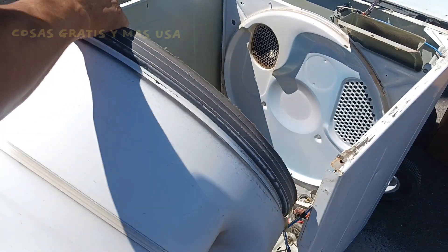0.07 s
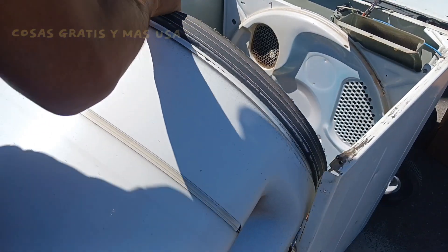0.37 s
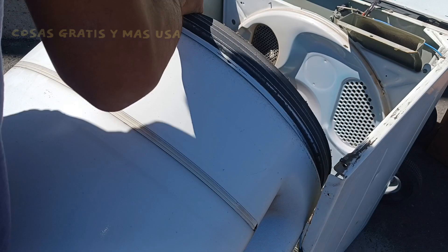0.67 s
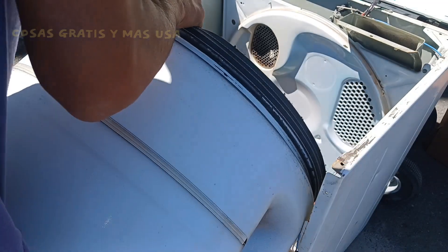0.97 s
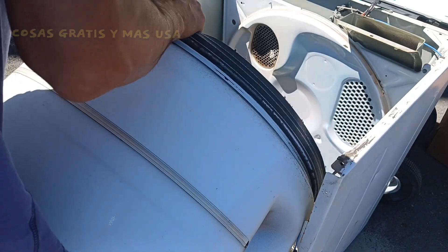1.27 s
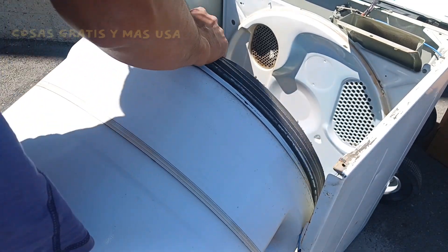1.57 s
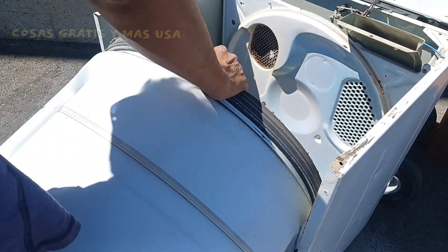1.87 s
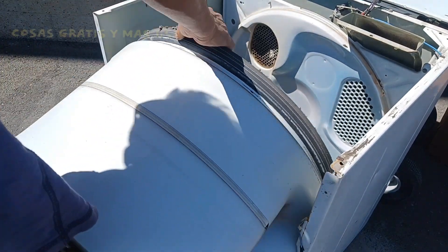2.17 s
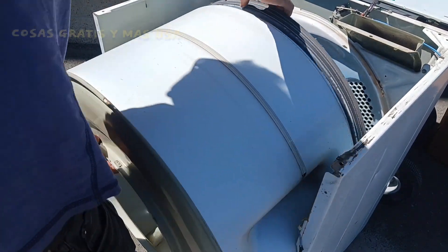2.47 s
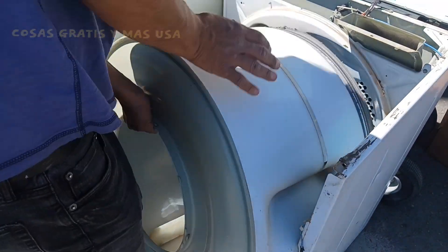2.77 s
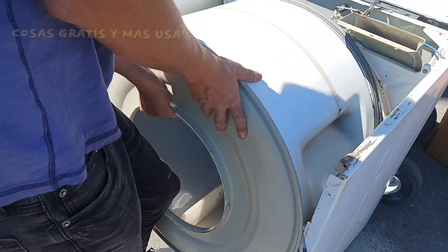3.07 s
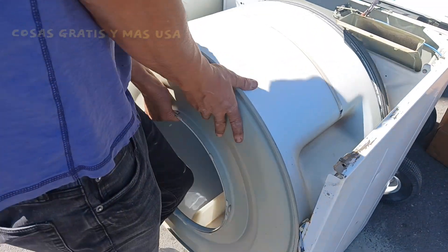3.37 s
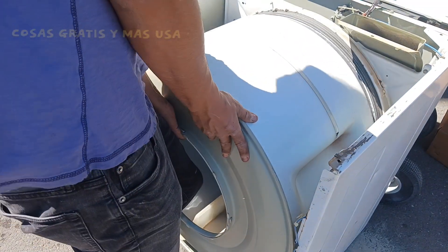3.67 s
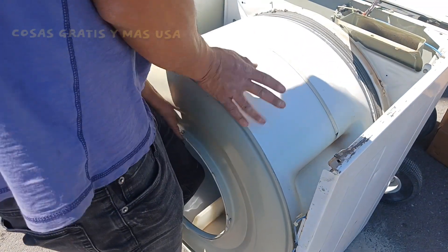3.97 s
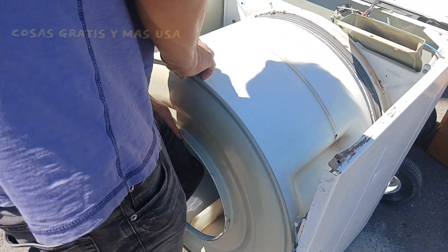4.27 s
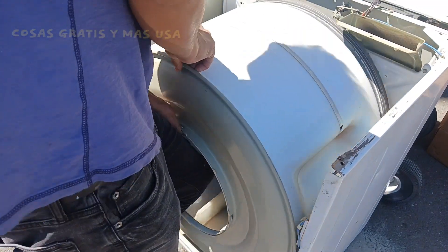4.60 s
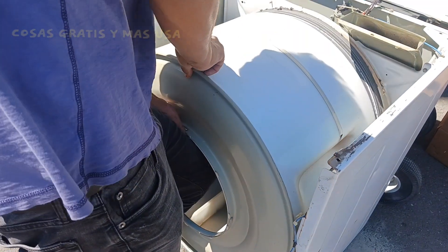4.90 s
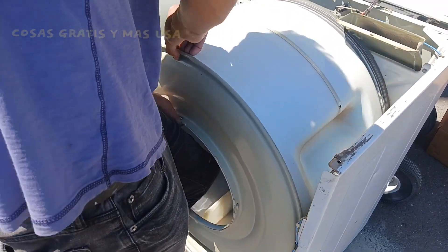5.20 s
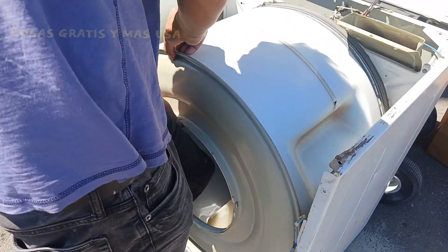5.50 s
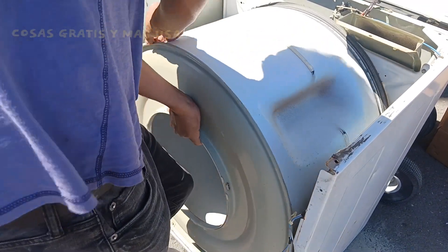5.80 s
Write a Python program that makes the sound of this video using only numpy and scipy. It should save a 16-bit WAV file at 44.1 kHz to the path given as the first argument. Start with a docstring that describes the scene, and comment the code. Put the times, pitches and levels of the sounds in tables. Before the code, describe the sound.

A large sheet-metal drum scrapes, knocks and squeaks against steel edges, groaning loudly once, while a breeze buffets the microphone outdoors.

```python
"""A large sheet-metal dryer drum is dragged and lowered into its cabinet, outdoors and close by.
Its rim sticks and slips over the steel edges, knocks against them, squeaks and once locks into a loud
groan. The jolts make the thin shell ring at its own natural tones, called modes. Light ticks, dull
bumps and a soft rustle come with the handling. A breeze buffets the two microphone openings,
and a quiet yard lies behind it all."""
import sys
import numpy as np
from scipy import signal
from scipy.fft import rfft, irfft, next_fast_len
from scipy.io import wavfile
from scipy.ndimage import uniform_filter1d, map_coordinates

SR = 44100
rng = np.random.default_rng(int(sys.argv[2]) if len(sys.argv) > 2 else 0)


def transcribe(u):
    """Save the signal u as a 16-bit wav file named by the first command-line argument.

    u: samples, shape (n,) or (channels, n), limited to [-1, 1]; the rate is SR.
    q: integer samples, one column per channel.
    """
    v = np.clip(np.atleast_2d(u).T, -1, 1)
    q = np.round(v * 32767).astype(np.int16)
    wavfile.write(sys.argv[1], SR, q)


N = 266540

# The drum speaks in four bands, low to high: boom, clang, rasp, sizzle. Table levels are relative.
BAND_EDGES_HZ = [150, 800, 2800, 7500, 17000]
OPPOSITE = np.array([[1], [-1]])  # plus on the left, minus on the right

# shoves that slide the rim: t/s, length/s, boom level/dB, bite (clang over boom)/dB, resonance f/Hz
SHOVES = [(0, 0.089, -51, 0, 480), (0.17, 0.04, -43.5, 5, 520), (0.355, 0.12, -22, -4, 540),
          (0.492, .29, -28.5, -10.5, 402), (0.91, 0.35, -40.5, -5, 370), (1.384, 0.087, -32, -0.5, 565),
          (1.626, 0.018, -29, -1.5, 486), (1.963, .06, -30.5, 0.5, 544), (2.065, 0.19, -25, -3, 536),
          (2.204, 0.26, -18, -2.5, 664), (2.48, 0.094, -17, -10.5, 605), (2.643, 0.097, -18.5, -2.5, 690),
          (2.75, 0.095, -16.5, -10.5, 555), (2.921, 0.15, -16.5, -6, 580), (3.025, 0.059, -12.5, -.5, 650),
          (3.108, 0.13, -21.5, -11.5, 580), (3.465, 0.24, -38.5, -3, 430), (3.705, 0.096, -38.5, -13, 380),
          (4.063, 0.0091, -39.5, -13, 386), (4.2, 0.37, -45.5, -12, 395), (4.469, 0.068, -32.5, -2, 436),
          (4.613, 0.065, -21, -1.5, 467), (4.755, 0.08, -22.5, -4.5, 417), (4.918, 0.048, -30, -7.5, 430),
          (5.187, 0.017, -20, -2.5, 610), (5.296, 0.076, -22.5, -7, 440), (5.423, 0.27, -31.5, -4.5, 400),
          (5.58, 0.094, -26, -2, 497), (5.728, 0.04, -27.5, -6.5, 460), (5.927, 0.059, -28, -6, 483)]
# how a shove feeds each of the four bands: offset/dB, share of the bite
SHOVE_BANDS = [(0.08, 0), (-2, 0.97), (-12, 1.39), (-17, 1.37)]
# metal hitting metal: t/s, clang level/dB, weight (extra boom)/dB, hardness (extra treble)/dB,
# f/Hz that the struck spot favours
KNOCKS = [(.042, -55.5, 3, 1.5, 6600), (.117, -54.5, 1, 10.5, 12350), (.297, -40, -9, -8, 540),
          (.357, -38.5, 8, 0, 507), (.392, -23.5, -6, -2, 3390), (.483, -51, 23, 5, 6350),
          (.685, -40, -12, -1, 540), (.951, -56, 2, 3.5, 3770), (.975, -40, -24, -4, 3800),
          (1.06, -45.5, -20, -0.5, 2200), (1.116, -43, -5, -0.5, 1800), (1.214, -47.5, -3, 8.5, 574),
          (1.231, -32.5, -9, -4, 2130), (1.298, -32.5, -22, -6.5, 543), (1.325, -17.5, -4.5, -8.5, 562),
          (1.402, -37.5, -19, -1, 5800), (1.487, -36.5, 6.5, -8, 656), (1.757, -57, -6, 2.5, 4140),
          (1.931, -34, -1, -15, 1150), (2.047, -28, 2, -12.5, 660), (2.19, -39, 5, -3, 490),
          (2.312, -26.5, -11, -11.5, 555), (3.229, -36.5, 5, -33, 480), (3.463, -45.5, 3, -5.5, 2850),
          (3.566, -38, 1.5, -24, 1235), (3.606, -43, 4, -12, 1690), (4.06, -47.5, 0, -33, 395),
          (4.438, -33.5, -6, -10, 470), (4.538, -42.5, 15, -3.5, 566), (4.616, -36.5, 13, 5.5, 1110),
          (4.642, -19, -1.5, -6.5, 1530), (4.724, -31.5, 5, -5.5, 483), (5.139, -24, -8, -19.5, 818),
          (5.156, -24.5, -1.5, -10.5, 860), (5.285, -25, 0.5, -7.5, 3550), (5.445, -55.5, 20, 4.5, 520),
          (5.579, -36.5, 8, 1, 533), (5.622, -29.5, 3.5, -10, 820), (5.907, -30, -9, -11.5, 1850)]
# the tones that make up the groan: multiple of its pitch, level/dB
GROAN_HARMONICS = [(1, -3.5), (2, -16.5), (3, -25), (4, -24), (5, -34), (6, -30)]
# brief squeaks of the rim: middle t/s, length/s, f/Hz, level/dB
SQUEAKS = [(.4, 0.017, 5400, -32), (0.398, .03, 5720, -39), (0.502, 0.12, 498, -34),
           (.788, 0.2, 484.6, -38.5), (0.876, .18, 200, -40), (2.194, 0.021, 484, -24.5),
           (2.346, 0.14, 560.8, -23.5), (2.492, 0.037, 774, -26), (2.682, .03, 640, -24),
           (2.706, 0.051, 1944, -30), (2.803, 0.048, 420, -28.5), (2.905, 0.098, 227, -34),
           (2.988, 0.089, 545.5, -24), (3.06, 0.19, 787, -28.5), (3.09, 0.11, 686, -25.5),
           (3.11, 0.22, 1115, -44), (5.164, 0.037, 1550, -29), (5.3, .036, 3490, -48),
           (5.911, .03, 4856, -44.5)]
# hands and knee bumping the shell: t/s, level/dB
BUMPS = [(.228, -33), (1.49, -31), (1.631, -29.5), (2.059, -24), (2.164, -24), (2.315, -18.5), (3.25, -39),
         (3.594, -29.5), (3.792, -38), (4.859, -27.5), (4.915, -26), (5.646, -27.5)]
# the shell's strongest modes: f/Hz, level/dB
STRONG_MODES = [(221, -4.5), (275, -9), (331, -9), (404, -13), (476, -13), (552, -2), (589, 1), (649, -26),
                (700, -0.5), (732, 4), (802, 2), (888, 3), (1114, -5), (1139, -9), (1192, -27), (1542, -16),
                (1733, -28), (1962, -11), (2401, -8), (2441, -1), (2637, -3), (3461, -15), (3779, -27),
                (3992, -13), (5316, -30)]
# the shell's crowd of weaker modes: f/Hz, level/dB
WEAK_MODE_SPECTRUM = [(120, -13.5), (210, -3), (320, -3), (480, -2), (660, -7), (880, -5.5), (1250, -5),
                      (1900, -7.5), (2600, -17), (3400, -20.5), (4600, -22), (8000, -34), (12500, -30.5),
                      (16000, -30)]
# how long the free shell takes to fade by 60 dB: f/Hz, ring time/s
RING_TIMES = [(200, 0.69), (500, 0.62), (1400, 0.34), (3700, 0.23), (9000, 0.23), (16000, 0.082)]
# how wide the shell sounds: f/Hz, level of the sides over the middle/dB
STEREO_WIDTH = [(120, -33), (380, -11.5), (700, -8), (1300, -5.5), (2400, -4), (4400, 0), (8000, 4),
                (15000, -1)]
# hands and clothes brushing the paint: t/s, length/s, level/dB
BRUSHES = [(0, .1, -62), (0.107, 0.31, -53.5), (0.546, 0.39, -54.5), (1.571, 0.13, -51), (1.869, 0.07, -49),
           (2.064, 0.02, -36.5), (2.36, 0.046, -33.5), (2.627, 0.032, -43.5), (2.89, 0.03, -34),
           (3.45, 0.23, -52), (3.8, 0.023, -56), (3.91, 0.12, -64.5), (4.16, 0.064, -59),
           (4.39, 0.046, -54), (4.544, 0.14, -39), (4.79, 0.044, -51), (5.044, 0.066, -56),
           (5.16, 0.025, -36.5), (5.724, 0.3, -46.5), (5.99, 0.091, -47.5)]
# strength of the breeze: t/s, level/dB
BREEZE = [(0, -41), (.19, -49), (.37, -31), (.77, -41.5), (1.28, -47.5), (1.62, -29.5), (1.78, -43.5),
          (2.2, -32.5), (2.7, -41.5), (3.15, -35), (3.8, -35.5), (3.92, -42), (4.22, -48), (4.5, -32),
          (5.05, -35), (5.6, -30.5), (6.04, -36)]
# strong swirls of air hitting the microphone: t/s, level/dB, f/Hz
EDDIES = [(1.499, -21, 100), (1.565, -22, 85), (2.2, -18, 90), (2.328, -11.5, 115), (2.462, -17, 80),
          (3.027, -16.5, 90), (3.115, -23, 100), (3.162, -15, 120), (3.26, -18, 100), (3.379, -16.5, 125),
          (4.09, -23, 75), (4.634, -20, 100), (4.771, -21, 90), (4.835, -16.5, 85), (4.928, -18, 90),
          (5.158, -16, 85), (5.652, -14, 115), (5.771, -23, 90), (6.002, -17, 90)]
# the low rumble of the wind: f/Hz, level/dB
WIND_SPECTRUM = [(20, -10), (40, -1), (62, 6.5), (95, 4.5), (130, 4), (180, -3.5), (300, -6.5), (600, -54)]
# the outdoor background: f/Hz, level/dB
YARD_SPECTRUM = [(30, 16), (150, -28), (500, -3), (1500, 21), (4000, -36), (8000, -35), (16000, -39)]


def scrape(force, levels, resonance_hz, judder_db=0.88):
    """The rim judders along the cabinet; as the contact moves, two spots of the shell fade in and out."""
    spots = [damped(shell_tap(modes_db=-12.5, crack_db=-29, crack_s=0.005), 0.14) for _ in range(2)]
    shell = bend(sum(excite(force * from_db(4.2 * drift(8)), spot) for spot in spots))
    boom = resonate(shell, resonance_hz, lift_db=12.5, width_octaves=1)
    _, clang, rasp, _ = split_bands(shell)
    sound = sum(level * steady(part, seconds=0.039) for level, part in zip(levels, [boom, clang, rasp]))
    return from_db(judder_db * drift(30)) * sound


def slips(per_s, spread_db):
    """The rim sticks and lets go: tiny jolts of uneven size that come in clumps."""
    happens = rng.random(N) < per_s * from_db(4 * drift(40)) / SR
    sizes = from_db(spread_db * np.minimum(rng.exponential(1, N), 4))
    return happens * sizes * rng.choice([-1, 1], N) + 0.013 * rng.standard_normal(N)


def shoves(rounding_s=0.0063):
    """Each shove swells and fades; the strongest one at any moment sets each band's level."""
    rises_s, falls_s = [0.37, 0.21, 0.21, 0.37], [0.66, 0.49, 0.25, 0.18]  # per 60 dB, for each band
    resting_db = [-72, -85, -71.5, -65]  # the rim never quite stops rubbing
    start_s, length_s, boom_db, bite_db, hz = np.transpose(SHOVES)[:, :, None]
    t = np.arange(0, N, 64) / SR
    outside_s = np.maximum([start_s - t, t - start_s - length_s], 0)
    early, late = np.hypot(outside_s, rounding_s) - rounding_s  # the drum's weight softens both ends
    bands = [from_db(boom_db + db + share * bite_db - 60 * (early / rise_s + late / fall_s))
             for (db, share), rise_s, fall_s in zip(SHOVE_BANDS, rises_s, falls_s)]
    levels = [np.hypot(pushes.max(axis=0), from_db(db)) for pushes, db in zip(bands, resting_db)]
    # each shove has its own hollow pitch, and the loudest shoves dominate the blend
    boom_power = bands[0] ** 2
    resonance_hz = np.sum(hz * boom_power, axis=0) / np.sum(boom_power, axis=0)
    return over_time(np.transpose([t, *levels, resonance_hz]))


def snags(levels, per_s=70, level_db=-15.5):
    """The sliding rim catches on rough bits of steel, each giving a small, dry crack."""
    crack = damped(shell_tap(modes_db=-11, crack_db=7, crack_s=0.0026), 0.018)
    happens = rng.random(N) < per_s / SR
    force = happens * from_db(level_db - np.clip(rng.standard_normal(N), -2, 2))
    return sum(excite(force * level, part / np.std(part[:, :SR // 100]))
               for level, part in zip(levels, split_bands(crack)[1:]))


def knocks(spot_lift_db=5, steel_rasp_db=5, snap_db=-7.5, snap_s=0.0067):
    """A blow is a sharp click plus the ring of one spot; weight and hardness balance its bands."""
    spots = [damped(shell_tap(modes_db=-8.5, crack_db=-19.5, crack_s=0.045), 0.45) for _ in range(3)]
    length, attack = spots[0].shape[1], int(0.018 * SR)
    clicks, click_gains = split_bands(signal.unit_impulse(length)), from_db([-5.5, -12, -21, -12])
    snap = 1 + from_db(snap_db) * np.exp(-np.arange(length) / SR / snap_s)  # a louder first instant
    out = np.zeros((2, N))
    for k, (s, clang_db, weight_db, hardness_db, hz) in enumerate(KNOCKS):
        start, spot = int(s * SR), snap * spots[k % len(spots)]
        favoured = signal.lfilter(*signal.iirpeak(hz, Q=11.7, fs=SR), spot)
        rings = split_bands(spot + from_db(spot_lift_db) * favoured)
        levels_db = clang_db + np.array([weight_db, 0, hardness_db + steel_rasp_db, 2 * hardness_db])
        for db, ring, click, gain in zip(levels_db, rings, clicks, click_gains):
            blow = ring / np.std(ring[:, :attack]) + gain * click / np.std(click[:attack])
            out[:, start:start + length] += from_db(db) * blow[:, :N - start]
    return from_db([[0.8], [-0.2]]) * out


def groan(level, pitch_hz=479.5, waver=0.0042):
    """The slips fall in step with one mode of the shell and make a nearly pure tone."""
    phase = 2 * np.pi * np.cumsum(pitch_hz * (1 + waver * drift(40))) / SR + 0.085 * OPPOSITE
    tone = sum(from_db(db + 0.76 * drift(90)) * np.sin(multiple * phase)
               for multiple, db in GROAN_HARMONICS)
    return level * unit_power(tone) * from_db([[-0.5], [0.5]])


def squeaks(waver=0.011, flutter_db=4):
    """The slips briefly lock to a mode: short, rough tones swell out of the scrape and sink back."""
    wobbly_time = np.cumsum(1 + waver * drift(160)) / SR
    flutter = from_db(flutter_db * drift(150))
    out = np.zeros((2, N))
    for (s, length_s, hz, db), side in zip(SQUEAKS, rng.choice([-1, 1], len(SQUEAKS))):
        near, bell = swell(s, length_s / 2)
        tone = np.sqrt(2) * np.sin(2 * np.pi * hz * wobbly_time[near] + side * stereo_phase(hz))
        out[:, near] += from_db(db) * bell * flutter[near] * tone
    return from_db(4.1) * out


def bumps():
    """A soft hand or knee wakes only the low modes and hushes them at once."""
    thud = damped(band(shell_tap(modes_db=5, crack_db=3, crack_s=0.0049), 110, 520), 0.057)
    force = np.zeros(N)
    for s, db in BUMPS:
        force[int(s * SR)] = from_db(db)
    return excite(force, thud / np.std(thud[:, :SR // 50]))


def shell_tap(modes_db, crack_db, crack_s):
    """The shell's answer to one tap: a first crack, a crowd of fading modes and a few strong ones."""
    t = np.arange(int(0.5 * SR)) / SR
    edges = np.geomspace(110, 17500, 23)
    noise = rng.standard_normal((2, 2, len(t)))
    crowd, strong = 0, 0
    for k, (low, high) in enumerate(zip(edges, edges[1:])):
        hz = np.sqrt(low * high)
        middle, sides = band(noise[k % 2], low, high)  # many close modes sound like noise
        width = from_db(at_hz(STEREO_WIDTH, hz))
        stereo = (middle + width * sides * OPPOSITE) / np.hypot(1, width)
        crowd += stereo * from_db(at_hz(WEAK_MODE_SPECTRUM, hz) - 60 * t / at_hz(RING_TIMES, hz))
    crowd *= 1 + from_db(crack_db) * np.exp(-t / crack_s)
    for (hz, db), (phase, side) in zip(STRONG_MODES, rng.uniform(-np.pi, np.pi, (len(STRONG_MODES), 2))):
        tone = np.sin(2 * np.pi * hz * t + phase + np.sign(side) * stereo_phase(hz))
        strong += tone * from_db(db - 60 * t / at_hz(RING_TIMES, hz))
    return unit_power(crowd) + from_db(modes_db) * unit_power(strong)


def bend(shell, depth=0.01411, per_s=9):
    """The thin wall bends under the load, so all its modes slide a little in pitch."""
    shift = depth * SR / per_s * uniform_filter1d(drift(per_s), SR // 30)
    return np.array([map_coordinates(side, [np.arange(N) + shift], order=3, mode="nearest")
                     for side in shell])


def resonate(shell, resonance_hz, lift_db, width_octaves):
    """Keep the shell's low range and boost the part near its moving resonance."""
    edges, size = np.geomspace(130, 1050, 10), next_fast_len(N)
    spectrum, hz = rfft(shell, size), np.arange(size // 2 + 1) * SR / size
    out = 0
    for low, high in zip(edges, edges[1:]):
        distance = np.log2(np.sqrt(low * high) / resonance_hz) / width_octaves
        part = irfft(spectrum * ((hz >= low) & (hz < high)), size)[:, :N]
        out += part * from_db(lift_db * np.exp(-distance ** 2))
    return out


def damped(ring, decay_s):
    """Something pressed on the shell shortens its ring."""
    return ring * np.exp(-np.arange(ring.shape[1]) / SR / decay_s)


def excite(force, ring):
    """Every jolt in the force starts its own copy of the ring."""
    return signal.fftconvolve(force[None], ring, axes=1)[:, :N]


def rustle(force, sizzle, grit=0.25, flare_s=0.0016):
    """Rim, hands and clothes rub dryly: a bright hiss that flares with every slip."""
    hiss = shaped_noise((2, N), [(2000, 6.5), (5000, -0.5), (8000, -5), (12500, -2), (16000, -5)])
    slip_power = signal.lfilter([1], [1, -np.exp(-1 / (flare_s * SR))], force ** 2)
    flare = steady(np.sqrt(slip_power), seconds=0.26)
    grainy_hiss = hiss * np.sqrt(1 - grit + grit * flare ** 2)
    brushing = sum(from_db(db) * envelope(s, length_s, rise_s=0.12, fall_s=0.26)
                   for s, length_s, db in BRUSHES)
    return np.hypot(sizzle, brushing) * from_db([[4.0], [1.8]]) * grainy_hiss


def wind(lump_db=9, eddy_s=0.0035, right_over_left_db=4.5):
    """Churning air rumbles at each microphone opening; one swirl gives a swing or two of pressure."""
    breeze_db, = over_time(BREEZE)
    air = np.zeros((2, N))
    for side in range(2):
        rumble = steady(shaped_noise(N, WIND_SPECTRUM), seconds=0.0444)
        air[side] = rumble * from_db(breeze_db + 2.5 + lump_db * np.tanh(drift(45)))
    for (s, db, hz), (offset, skew) in zip(EDDIES, rng.uniform(-0.34, 0.44, (len(EDDIES), 2))):
        near, bell = swell(s, eddy_s)
        cycles = hz * near / SR + offset + 0.35 * skew * OPPOSITE
        air[:, near] += from_db(db) * np.sqrt(2) * bell * np.sin(2 * np.pi * cycles)
    return air * from_db(-OPPOSITE * right_over_left_db / 2)  # the right opening faces the breeze


def yard(level_db=-61):
    """The faint, even hush of the outdoors."""
    return from_db(level_db) * shaped_noise((2, N), YARD_SPECTRUM)


def from_db(db):
    """Turn decibels into a number to multiply by."""
    return 10 ** (np.asarray(db) / 20)


def unit_power(x):
    """Scale a sound so its average power is 1."""
    return x / np.sqrt(np.mean(x ** 2) + 1e-20)


def steady(x, seconds):
    """Even out a sound so its power stays near 1 all along."""
    power = uniform_filter1d(np.mean(np.atleast_2d(x) ** 2, axis=0), int(seconds * SR))
    return x / np.sqrt(np.abs(power) + 1e-18)


def over_time(rows):
    """Join a table's timed points with lines, giving a value at every sample."""
    times, *columns = np.transpose(rows)
    return np.array([np.interp(np.arange(N) / SR, times, column) for column in columns])


def at_hz(table, hz):
    """Look up a frequency in a table, with octaves evenly spaced."""
    known_hz, values = np.transpose(table)
    return np.interp(np.log(np.maximum(hz, 1)), np.log(known_hz), values)


def stereo_phase(hz):
    """Put left and right out of step so a tone sounds as wide as the shell."""
    return np.arctan(from_db(at_hz(STEREO_WIDTH, hz))) * OPPOSITE


def band(x, low_hz, high_hz):
    """Keep what lies between two frequencies."""
    return signal.sosfilt(signal.butter(4, [low_hz, high_hz], "band", fs=SR, output="sos"), x)


def split_bands(x):
    """Split a sound into boom, clang, rasp and sizzle."""
    return [band(x, low, high) for low, high in zip(BAND_EDGES_HZ, BAND_EDGES_HZ[1:])]


def shaped_noise(shape, spectrum):
    """Noise of power 1, coloured by a list of (f/Hz, level/dB) points."""
    gains = from_db(at_hz(spectrum, np.arange(N // 2 + 1) * SR / N))
    return unit_power(irfft(rfft(rng.standard_normal(shape)) * gains, N))


def drift(per_s):
    """A random wander of typical size 1 that turns per_s times a second."""
    points = rng.standard_normal(N // 40)
    return np.interp(np.arange(N) * per_s / SR, np.arange(len(points)), points) * np.sqrt(1.5)


def swell(s, width_s):
    """A bell-shaped swell around a moment: its sample numbers and its heights."""
    near = np.arange(max(int((s - 4 * width_s) * SR), 0), min(int((s + 4 * width_s) * SR), N))
    return near, np.exp(-0.5 * ((near / SR - s) / width_s) ** 2)


def envelope(start_s, hold_s, rise_s, fall_s):
    """Rise to 1, hold and die away; rise_s and fall_s each cover 60 dB."""
    t = np.arange(N) / SR - start_s
    fade = np.maximum(-t, 0) / rise_s + np.maximum(t - hold_s, 0) / fall_s
    return from_db(-60 * np.minimum(fade, 2))


def scene():
    """Add up the drum, the handling, the wind and the quiet yard."""
    force = slips(per_s=260, spread_db=4.5)
    boom, clang, rasp, sizzle, resonance_hz = shoves()
    groan_level = from_db(-8.7) * envelope(start_s=3.032, hold_s=0.058, rise_s=0.081, fall_s=0.36)
    boom = boom / (1 + 0.75 * groan_level)  # the groan draws some of the boom into its one mode
    sliding = scrape(force, [boom, clang, rasp], resonance_hz) + snags([clang, rasp, sizzle])
    drum = sliding + knocks() + bumps() + squeaks() + groan(groan_level)
    return drum + rustle(force, sizzle) + wind() + yard()


def record(dry, cutoff_hz=15800):
    """Squash the loudest peaks and cut off the highest treble."""
    limited = dry / (1 + dry ** 8) ** (1 / 8)
    return signal.sosfilt(signal.ellip(10, 0.1, 70, cutoff_hz, fs=SR, output="sos"), limited)


dry = scene()
out = record(dry)
transcribe(out)
```